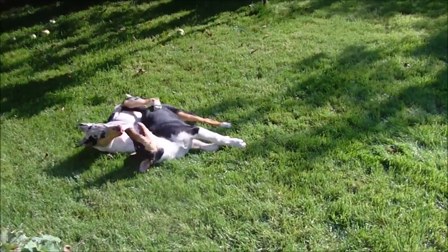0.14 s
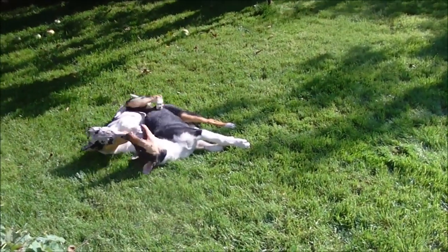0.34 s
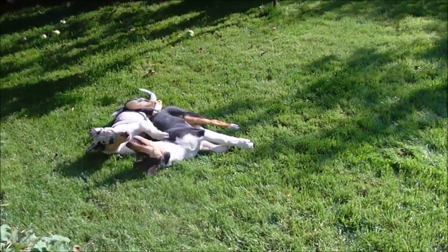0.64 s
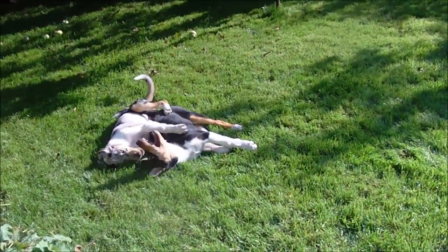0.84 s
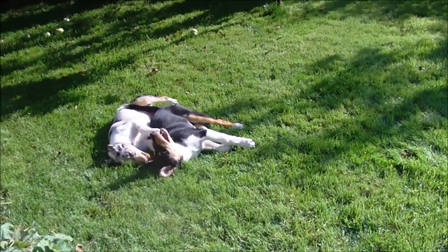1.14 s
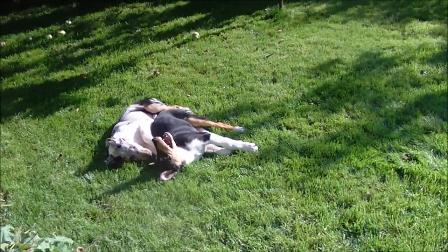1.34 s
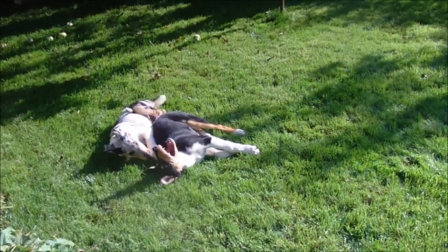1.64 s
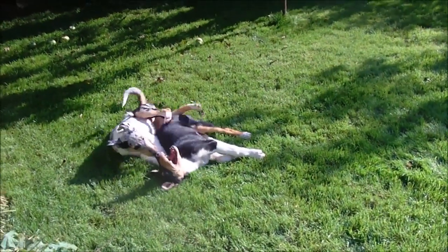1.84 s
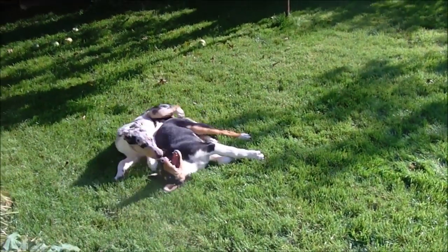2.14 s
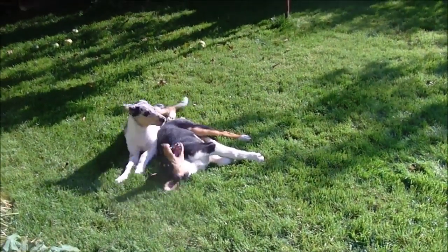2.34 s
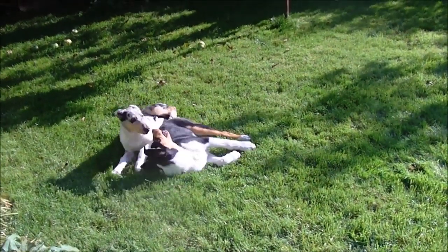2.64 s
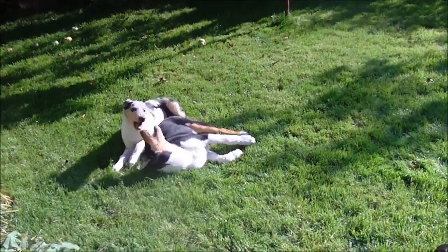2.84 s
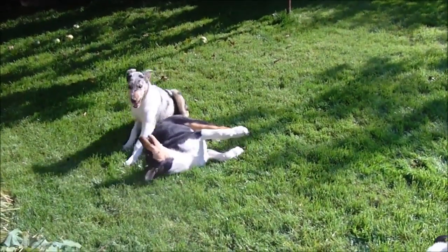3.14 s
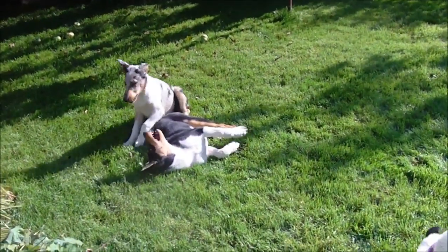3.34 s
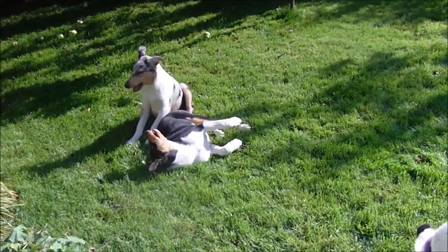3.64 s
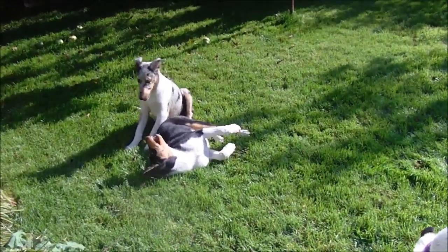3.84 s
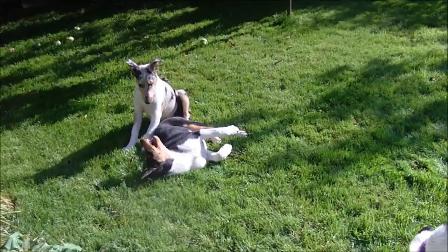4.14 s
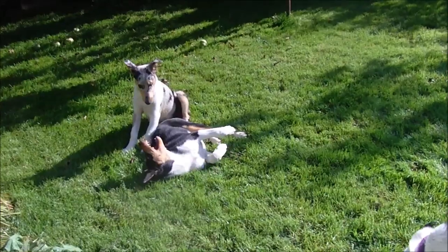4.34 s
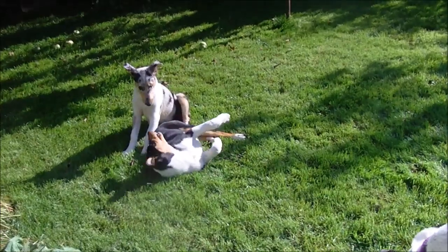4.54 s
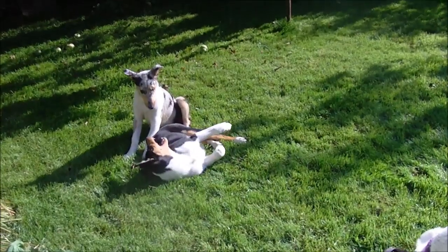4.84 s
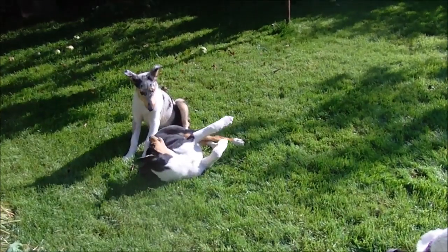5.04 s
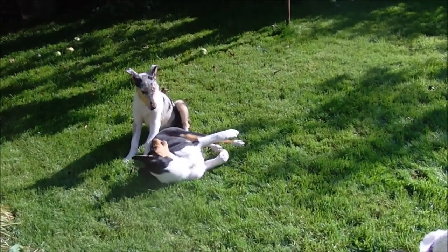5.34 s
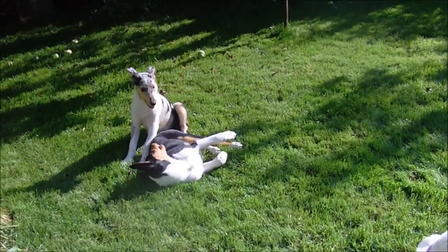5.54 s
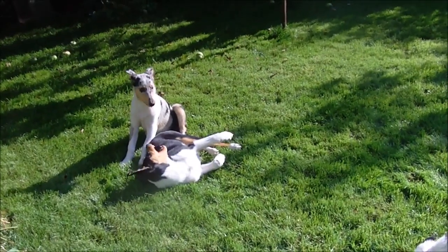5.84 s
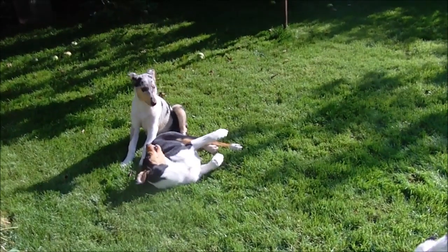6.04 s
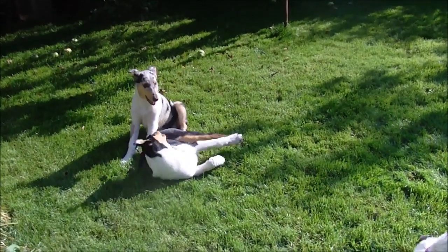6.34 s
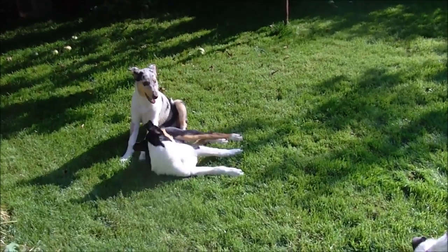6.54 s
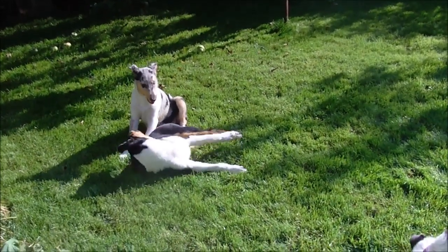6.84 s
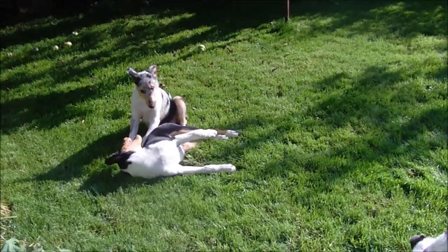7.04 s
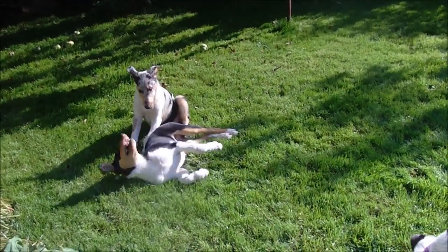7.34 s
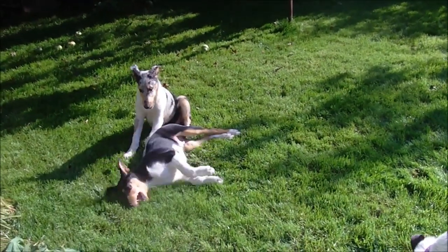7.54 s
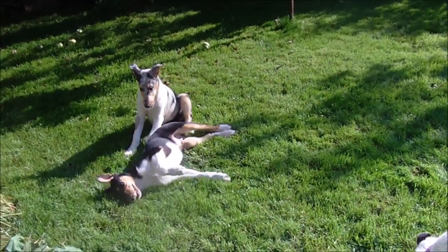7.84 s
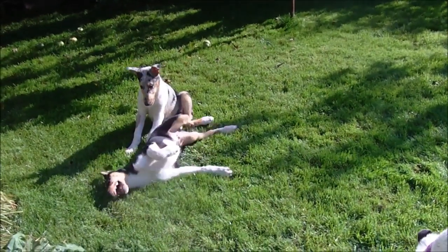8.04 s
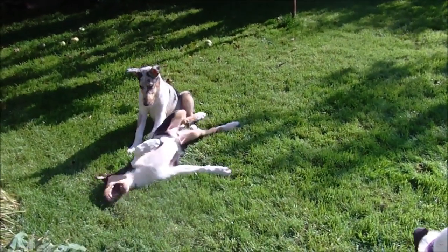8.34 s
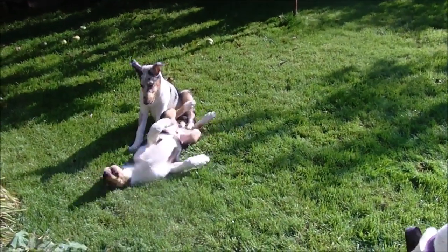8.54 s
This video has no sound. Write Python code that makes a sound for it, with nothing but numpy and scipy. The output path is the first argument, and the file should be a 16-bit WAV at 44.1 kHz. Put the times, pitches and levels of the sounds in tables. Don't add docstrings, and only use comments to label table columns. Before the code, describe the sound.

A young puppy whines, yaps, yelps piercingly and barks on a lawn, with sparse tooth and paw knocks over faint outdoor hiss.

```python
import sys
import numpy as np
from scipy import signal
from scipy.fft import rfft, irfft, next_fast_len
from scipy.io import wavfile
from scipy.ndimage import uniform_filter1d

SR = 44100
rng = np.random.default_rng(int(sys.argv[2]) if len(sys.argv) > 2 else 0)


def boost_factor(decibels):
    exponent = np.asarray(decibels, float) / 20
    return 10 ** exponent


def dump_mix(stems):
    frames = np.atleast_2d(stems).T
    limited = np.clip(frames, -1, 1)
    pcm = np.round(limited * 32767).astype(np.int16)
    wavfile.write(sys.argv[1], SR, pcm)


N = 383669

# (time [s], pitch [Hz], effort [dB])
FIRST_WHINE = [
    [(0.4, 0.5, -9), (0.0, 1360, -11.5), (0.01, 1400, -23.5), (0.024, 994, -18.5), (0.034, 980, -21),
     (0.098, 894, -33.5), (0.135, 770, -40)],
    [(0.55, 0.56, -12.5), (0.16, 940.0, -36.5), (0.16, 884.0, -39.5), (0.182, 996.0, -38.5)],
    [(0.81, 0.78, -10), (0.184, 1030, -39.5), (0.204, 1082, -35.5), (0.228, 1084, -29.5),
     (0.236, 1030, -30)],
    [(0.56, 0.97, -11.5), (0.24, 940, -23.5), (0.292, 963.0, -32.5), (0.392, 826, -39), (0.456, 964, -29),
     (0.524, 760, -44)],
    [(0.74, 0.98, -11.5), (0.527, 707.0, -40), (0.571, 953, -28.5), (0.599, 1015, -21.0),
     (0.618, 1135.0, -26), (0.671, 910, -31.5), (0.742, 730.0, -46), (0.775, 550, -43), (0.8, 410, -56)],
]
LONG_WHINE = [
    [(0.97, 0.84, -12), (1.012, 1050, -22.5), (1.045, 1161.0, -15), (1.078, 1184, -19.5),
     (1.099, 976.0, -26), (1.119, 661.0, -39.5), (1.135, 550, -27)],
    [(0.6, 0.64, -7), (1.14, 475, -31.5), (1.208, 486, -37.5), (1.255, 460, -41.5), (1.28, 482.0, -46.5),
     (1.47, 463, -42.5)],
    [(0.81, 0.76, -8.5), (1.473, 410, -43.5), (1.495, 597, -38.5), (1.53, 710, -30.5), (1.591, 656, -36),
     (1.636, 597, -38.5), (1.675, 640.0, -39.0), (1.745, 687, -39), (1.8, 590.0, -35), (1.87, 537, -40.5)],
]
RISING_YAP = [
    [(1.17, 0.83, -10.5), (2.135, 514, -43), (2.159, 470, -41), (2.186, 532, -41)],
    [(0.76, 0.61, -11), (2.192, 710, -46), (2.262, 630, -48)],
    [(0.55, 1.15, -8.5), (2.267, 557, -44.5), (2.377, 505, -45), (2.401, 690, -50.5), (2.42, 905, -34.5),
     (2.446, 1060, -21.5), (2.464, 1150, -18.5), (2.484, 1225, -27.5), (2.52, 1263.0, -22)],
    [(0.68, 0.52, -6.5), (2.523, 1584.0, -16), (2.55, 1530, -23.5), (2.575, 1180, -33.5), (2.6, 1010, -47),
     (2.654, 518.0, -43.5), (2.7, 423.0, -51.5)],
]
SHORT_YAPS = [
    [(0.75, 1.12, -9), (2.968, 610, -42), (2.976, 590, -32.5), (3.0, 725, -28.5), (3.011, 855, -23)],
    [(0.74, 0.98, -11), (3.011, 1000, -25), (3.02, 1050, -19), (3.035, 1105, -25.5), (3.048, 1290, -24),
     (3.066, 1160, -26), (3.085, 960, -32.5), (3.117, 760, -41)],
    [(0.61, 0.7, -9.5), (3.121, 640, -41), (3.177, 450, -48), (3.23, 393, -60)],
    [(0.92, 1.06, -8), (3.578, 555.0, -33), (3.594, 514, -31), (3.613, 935.0, -30)],
    [(0.89, 0.88, -10.5), (3.612, 1020, -27), (3.62, 1040, -19), (3.643, 1130, -23), (3.664, 1000, -31),
     (3.692, 790, -42)],
    [(0.83, 0.58, -8), (3.696, 730, -41.5), (3.712, 510, -40), (3.755, 438.0, -59.5)],
]
YELPS = [
    [(0.5, 0.72, -9), (4.178, 435, -46), (4.205, 620, -47), (4.22, 530, -48), (4.265, 570, -45),
     (4.287, 720, -44)],
    [(0.72, 0.55, -9), (4.29, 880, -39), (4.342, 880, -44.5), (4.376, 1000, -44), (4.435, 900, -64.5)],
    [(1.17, 1.96, -13), (4.447, 1560, -37), (4.456, 1585, -26.5), (4.499, 1727, -7.5), (4.537, 1657, -11.5),
     (4.551, 1590, -27), (4.61, 1600, -37.5)],
    [(1.5, 2, -10), (4.612, 1650, -38), (4.687, 1630, -32), (4.701, 1672, -21.5), (4.717, 1520, -27),
     (4.735, 1140, -34.5), (4.745, 920, -37.5), (4.79, 790, -53)],
    [(1.12, 0.61, -8), (4.985, 1000, -31.5), (5.003, 1130, -22), (5.011, 1140, -26), (5.028, 1170, -16)],
    [(1.53, 1.7, -11.5), (5.022, 1440, -22.5), (5.035, 1830, -16.5), (5.042, 1830, -9), (5.053, 1910, -7.5),
     (5.065, 1840, -11.5), (5.085, 1400, -20), (5.101, 1215, -27.5), (5.117, 915, -28.5),
     (5.128, 750, -37.5)],
]
WAVERING_HOWL = [
    [(0.51, 0.97, -8.5), (5.853, 542.0, -54), (5.877, 630, -35.5), (5.892, 815.0, -33.5)],
    [(0.7, 0.66, -10), (5.892, 960, -33), (5.908, 1100, -31), (5.951, 907, -32.5), (6.0, 814, -45),
     (6.024, 890, -36), (6.04, 1020, -35.5)],
    [(1.31, 2.2, -13), (6.042, 1190, -30.5), (6.062, 1350, -26), (6.086, 1386, -27), (6.13, 1194, -39.5),
     (6.165, 1367, -31.5), (6.201, 1426, -29.5), (6.241, 1265.0, -29)],
    [(1.01, 0.46, -7.5), (6.243, 1330, -28), (6.26, 1307, -25.5), (6.306, 1455, -29), (6.328, 1573, -18.5),
     (6.388, 1676, -10), (6.417, 1600, -26), (6.455, 1430, -38.5), (6.486, 850, -41.5), (6.55, 760, -54)],
]
CHATTER = [
    [(0.69, 0.82, -6.5), (6.958, 610, -43.5), (6.995, 662, -31.5), (7.03, 730, -40), (7.05, 900, -33),
     (7.058, 780, -41.5)],
    [(0.79, 1.09, -7), (7.062, 611.0, -33), (7.084, 550, -43), (7.158, 707.0, -35), (7.189, 800, -34),
     (7.214, 710, -37), (7.25, 760, -36), (7.264, 836, -32.5)],
    [(0.78, 0.8, -11), (7.267, 1006, -23.0), (7.309, 980, -29), (7.336, 870, -31.0)],
    [(0.62, 0.81, -9), (7.34, 668.0, -33), (7.354, 600, -40.5), (7.399, 660, -33.5), (7.428, 644, -34.5),
     (7.48, 467, -52)],
    [(0.4, 0.404, -8.5), (7.695, 660, -60), (7.735, 730, -50.5)],
    [(1.3, 1.4, -4), (7.738, 455, -40), (7.76, 453, -35), (7.8, 403, -38.5), (7.818, 360, -56)],
    [(0.55, 0.6, -7), (8.572, 515, -47), (8.62, 490, -52), (8.645, 440, -45.5), (8.699, 394, -55.5)],
]
BARKS = [
    [(.75, .85, -13), (6.745, 600, -32.5), (6.757, 640, -27.5), (6.769, 850, -23), (6.776, 880, -12.5),
     (6.791, 1010, -14), (6.839, 1003, -17), (6.856, 940, -24.5), (6.875, 930, -36)],
    [(1.1, 1.44, -7), (8.387, 536, -23.5), (8.402, 760, -12), (8.415, 876, -15), (8.437, 937, -15.5),
     (8.474, 876, -17.5), (8.484, 840, -32), (8.505, 760, -42)],
]
# (start [s], end [s], roughness [0-1])
HOARSE = [(0, .1, .18), (2.53, 2.7, .28), (2.97, 3.23, .3), (3.578, 3.625, .33), (3.68, 3.76, .27),
          (4.16, 4.26, .23), (4.555, 4.68, .5), (4.725, 4.8, .6), (6.43, 6.55, .35), (5.015, 5.036, .8),
          (5.09, 5.14, .35), (5.85, 5.92, .4), (5.93, 6.0, .25), (6.745, 6.765, .3), (6.79, 6.9, .58),
          (7.01, 7.07, .45), (8.419, 8.53, .8)]
# (start [s], length [s], from [Hz], to [Hz], level [dB])
SECOND_TONES = [
    (.89, .06, 646, 435, -50),
    (2.523, 0.04, 1284, 1290, -17),
    (4.577, 0.09, 4200, 3950, -40),
    (5.03, .09, 1135, 1146, -18.5),
    (6.79, .12, 1730, 1800, -13),
    (8.43, .08, 3400, 3400, -20),
]
# (frequency [Hz], gain [dB])
MOUTH = [(300.0, -19.5), (600.0, -6.5), (900.0, -4.5), (1300.0, 7.5), (1800.0, 7), (2400.0, 18.5),
         (3200.0, 4.5), (4500.0, 9.5)]
# (frequency [Hz], gain [dB])
THROAT = [(450, -2), (1000, 0), (2500, 0.5), (3300, -8.5), (3750, -16), (5500, -24.5), (9000, -19),
          (14000, -21)]
# (frequency [Hz], width [Hz], gain [dB])
NOSE = [(4460, 350, 8), (6170, 330, 7.5), (8050, 820, 5.5), (11260, 370, 7.5), (13300, 500, 7)]
# (frequency [Hz], density [dB per Hz])
BREATH = [(150, -2), (500, 1), (1200, 8), (2500, 17.5), (3700, 11), (4600, 11), (8000, 6), (15500, 2.5)]
# (start [s], length [s], from [Hz], to [Hz], level [dB])
GROANS = [
    (1.2, 0.38, 215, 192, -75),
    (7.83, 0.29, 157.8, 142.2, -80.5),
]
GROAN_PARTIALS_DB = [1, 11.5, 12, 8.5, 14, -17.5, -22.5, -2, 2.5]
# (start [s], length [s], from [Hz], to [Hz], level [dB])
SQUEAKS = [(0.575, .03, 5800, 6200, -55), (2.092, 0.028, 3350, 3650, -48), (4.12, 0.1, 5500, 5660, -67),
           (4.228, .02, 5600, 5560, -67), (4.35, .11, 5300, 5400, -68), (4.385, 0.065, 4350, 5100, -58),
           (4.37, 0.046, 8900, 8650, -57), (4.375, .055, 13100, 13600, -60.5),
           (4.575, .05, 8500, 8000, -54), (4.775, .02, 3700, 4100, -55), (4.995, .06, 4450, 4620, -46),
           (8.615, .02, 7400, 7200, -58), (1.52, .07, 6280, 6100, -60), (1.725, .045, 6050, 6200, -65),
           (8.628, .06, 2800, 2500, -50)]
# (time [s], peak [dB], ring [Hz], ring t60 [s], crack [dB])
KNOCKS = [
    (0.4744, -23, 5270, 0.01, -11),
    (0.4795, -12, 2940, 0.0079, -23),
    (0.481, -23, 1290, 0.04, -30),
    (0.955, -14.5, 810, 0.013, -88),
    (0.958, -30, 902, 0.06, -41),
    (1.138, -27.5, 800, 0.018, -43),
    (1.336, -28, 1204, 0.011, -34),
    (5.382, -45, 2804, 0.013, -11.5),
    (5.49, -21, 2660, 0.01, -3),
    (8.134, -42.5, 1860, 0.029, -15),
]
# (time [s], level [dB])
RUSTLE = [
    [(5.37, -58), (5.382, -57), (5.48, -69)],
]
# (frequency [Hz], density [dB per Hz])
RUSTLE_TONE = [(500, -15), (2900, -2.5), (5000, -7), (15800, -10)]
# (frequency [Hz], t60 [s])
GARDEN = [(300, 0.21), (1000, 0.21), (3500, 0.15), (10000, 0.14)]
# (frequency [Hz], t60 [s])
FAR_TREES = [(300, 2.4), (1500, 0.53), (4000, 0.81), (10000, 0.3)]
# (time [s], pitch [Hz], level [dB])
INSECT = [(3.25, 7870, -80), (3.4, 7870, -77), (4.85, 7870, -78)]
# (time [s], level [dB])
BUSTLE = [(0, -58), (1.5, -56.5), (3, -65), (4, -84.5), (7.6, -84.5), (8, -58.5), (8.7, -90)]
# (frequency [Hz], density [dB per Hz])
AIR = [(22, -7.5), (80, -13.5), (157, -6.5), (450, -4.5), (1160, -5), (5850, -16), (14700, -18),
       (15900, -16)]
# (frequency [Hz], level [dB])
HUM = [(60, -88), (120, -85.5)]


def voice(rows, mouth_from, mouth_to, tilt_db):
    t, fade, (hz, effort_db) = unrolled(rows, edge=0.004)
    hz = uniform_filter1d(hz, size=600, mode="nearest")
    rough = roughness(t)
    jitter = (0.0015 + 0.02 * rough) * flutter(len(t), 150)
    turn = 2 * np.pi * np.cumsum(hz * (1 + jitter)) / SR
    mouth = np.linspace(mouth_from, mouth_to, len(t))
    sound = folds(hz, turn, effort_db, rough, mouth, tilt_db)
    sound = signal.lfilter(*signal.butter(3, 300, "high", fs=SR), sound)
    return (breath(turn, effort_db, rough) - np.sqrt(2) * sound) * fade


def folds(hz, turn, effort_db, rough, mouth, tilt_db):
    n = len(hz)
    k = np.arange(1, min(23, 1 + int(SR / 2.7 / hz.min())))[:, None]
    db = partials(k, hz, effort_db, mouth, tilt_db)
    db += 3.1 * (k > 2) * flutter(n, 14, count=len(k))
    db += 1.1 * flutter(n, 42, count=len(k))
    smear = rough * (0.16 + 0.3 * k) + 0.065 * (k * hz / 4000) ** 2
    smear = np.minimum(smear, 0.9)
    blur_hz = 150 + 220 * rough.max() ** 2
    blur = flutter(n, blur_hz, count=2 * len(k), order=4) / np.sqrt(2)
    lines = (np.sqrt(1 - smear ** 2) + smear * blur[::2]) * np.cos(k * turn)
    lines -= smear * blur[1::2] * np.sin(k * turn)
    halves = boost_factor(-4.5) * rough ** 2 * flutter(n, 190, count=5, order=4) * np.cos((k[:5] + 0.5) * turn)
    return (boost_factor(db) * lines).sum(0) + (boost_factor(db[:5]) * halves).sum(0)


def partials(k, hz, level_db, mouth, tilt_db):
    line_hz = k * hz
    db = tilt_db * np.log2(k) + read(MOUTH, line_hz / mouth) + read(THROAT, line_hz) + nose(line_hz)
    db -= 90 * (line_hz > SR / 2.7)
    db -= 5 * (k > 2) * np.clip(4 * (hz / 1240 - 1), 0, 1)
    return level_db + db - 10 * np.log10((boost_factor(db) ** 2).sum(0))


def nose(hz):
    return sum(db * np.exp(-((hz - at_hz) / width) ** 2) for at_hz, width, db in NOSE)


def roughness(t):
    clear, slip_s = 0.07, 0.012
    start, end, depth = np.transpose(HOARSE)[:, :, None]
    inside = np.clip(np.minimum(t - start, end - t) / slip_s + 0.5, 0, 1)
    return clear + (inside * (depth - clear)).max(0)


def breath(turn, effort_db, rough):
    puffs = rng.standard_normal(len(turn)) * (1 + 0.12 * np.cos(turn))
    return coloured(puffs, BREATH, nasal=0.41) * boost_factor(0.69 * effort_db - 45.5 + 2 * rough)


def groan(rows):
    t, fade, (hz, db) = unrolled(rows, edge=0.02)
    turn = 2 * np.pi * np.cumsum(hz * (1 + 0.0054 * flutter(len(t), 40))) / SR
    stack = sum(boost_factor(p) * np.cos((k + 1) * turn) for k, p in enumerate(GROAN_PARTIALS_DB))
    return np.sqrt(2) * stack * boost_factor(db) * fade


def whistle(rows, waver=0.00092, shake_db=4):
    t, fade, (hz, db) = unrolled(rows, edge=0.013)
    turn = 2 * np.pi * np.cumsum(hz * (1 + waver * flutter(len(t), 80))) / SR
    return np.sqrt(2) * boost_factor(db + shake_db * flutter(len(t), 36)) * np.sin(turn) * fade


def knock(db, hz, t60, crack_db):
    t = np.arange(2500) / SR
    t60 = max(t60, 0.004)
    ring = np.sin(2 * np.pi * hz * t) * boost_factor(-60 * t / t60)
    thud = evened(coloured(rng.standard_normal(len(t)), [(150, -30), (hz, 0), (3500, -6), (9000, -25)]))
    thud = thud * boost_factor(-12.5 - 60 * t / (1.68 * t60))
    crack = np.diff(rng.standard_normal(len(t) + 1)) * boost_factor(crack_db - 60 * t / 0.008)
    blow = (ring + thud + crack) * np.minimum(t / 0.0002, 1)
    return boost_factor(db) * signal.lfilter(*signal.butter(3, 330, "high", fs=SR), blow)


def rustle(rows):
    t, fade, (db,) = unrolled(rows)
    grains = rng.standard_normal(len(t)) * boost_factor(2.9 * flutter(len(t), 430))
    return evened(coloured(grains, RUSTLE_TONE)) * boost_factor(db + 8.5) * fade


def garden(x):
    echoes = scatter(GARDEN, 0.0051, -12) + scatter(FAR_TREES, 0.029, -31)
    echoes[round(0.043 * SR)] += boost_factor(-21.5)
    return signal.fftconvolve(x, echoes)[:N]


def scatter(decays, start, db):
    taps = np.zeros(SR)
    at = np.arange(0, SR - 20, 20) + rng.integers(0, 20, (SR - 1) // 20)
    taps[at] = rng.choice([-1., 1.], len(at)) * np.clip((at / SR - start) / 0.012, 0, 1)
    hz, t, z = signal.stft(taps, SR, nperseg=256)
    tail = signal.istft(z * boost_factor(-60 * t / read(decays, hz)[:, None]), SR, nperseg=256)[1]
    return boost_factor(db) * tail / np.linalg.norm(tail)


def insect():
    return whistle(INSECT, waver=0.0004, shake_db=1.5)


def air():
    t = np.arange(N) / SR
    hiss = boost_factor(-64) * evened(coloured(rng.standard_normal(N), AIR))
    low_tone = [(60, -39.5), (200, -3.5), (700, 6), (1500, -4.5), (4000, -10.5), (16000, -35)]
    low = evened(coloured(rng.standard_normal(N), low_tone))
    bustle = low * boost_factor(np.interp(t, *np.transpose(BUSTLE)) - 3.5 + 0.93 * flutter(N, 14))
    hum = sum(np.sqrt(2) * boost_factor(db + 1.5 * flutter(N, 3)) * np.sin(2 * np.pi * hz * t) for hz, db in HUM)
    return hiss + bustle + hum


def evened(x):
    return x / np.sqrt(np.mean(x ** 2) + 1e-20)


def read(points, hz):
    f, value = np.transpose(points)
    return np.interp(np.log(hz + 1), np.log(f + 1), value)


def coloured(x, points, nasal=0):
    size = next_fast_len(len(x), True)
    hz = np.fft.rfftfreq(size, 1 / SR)
    return irfft(rfft(x, size) * boost_factor(read(points, hz) + nasal * nose(hz)), size)[:len(x)]


def flutter(length, hz, count=1, order=2):
    at = np.arange(length) / 8
    low_pass = signal.butter(order, hz, fs=SR / 8, output="sos")
    rows = signal.sosfilt(low_pass, rng.standard_normal((count, length // 8 + 302)))
    rows = evened(rows[:, 300:])
    i = at.astype(int)
    return (rows[:, i] + (at - i) * (rows[:, i + 1] - rows[:, i])).squeeze()


def unrolled(rows, edge=0.0038):
    s, *columns = np.transpose(rows)
    t = np.arange(s[0], s[-1] + 2 * edge, 1 / SR)
    fade = np.clip(np.minimum(t - s[0], (t[-1] - t) / 2) / edge, 0, 1)
    return t, fade, [np.interp(t, s, c) for c in columns]


def glide(start, length, from_hz, to_hz, db, sag_db=0):
    return [(start, from_hz, db), (start + length, to_hz, db + sag_db)]


def add(mix, s, sound):
    part = mix[max(round(s * SR), 0):][:len(sound)]
    part += sound[:len(part)]


def scene():
    dogs, near = np.zeros(N), air()
    calls = FIRST_WHINE + LONG_WHINE + RISING_YAP + SHORT_YAPS + YELPS + WAVERING_HOWL + CHATTER + BARKS
    for mouth, *rows in calls:
        add(dogs, rows[0][0], voice(rows, *mouth))
    for row in SECOND_TONES:
        add(dogs, row[0], whistle(glide(*row, sag_db=-24), waver=0.006))
    for row in GROANS:
        add(dogs, row[0], groan(glide(*row, sag_db=-2.5)))
    for row in SQUEAKS:
        add(dogs, row[0], whistle(glide(*row)))
    for s, *blow in KNOCKS:
        at_microphone = 5.4 < s < 5.6
        add(near if at_microphone else dogs, s, knock(*blow))
    for rows in RUSTLE:
        add(near, rows[0][0], rustle(rows))
    add(near, INSECT[0][0], insect())
    return (dogs + garden(dogs) + near)[None]


def roll_off(x):
    return signal.sosfilt(signal.butter(12, 17070, fs=SR, output="sos"), x)


def record(dry):
    limited = np.tanh(0.6 * dry - 0.002 * dry ** 2) / 0.6
    cut = signal.lfilter(*signal.butter(2, 60, "high", fs=SR), limited)
    edge = signal.firwin(255, 15900, window=("kaiser", 8), fs=SR)
    mix = signal.oaconvolve(cut, edge[None], "same")
    return roll_off(mix)


dry = scene()
out = record(dry)
dump_mix(out)
```